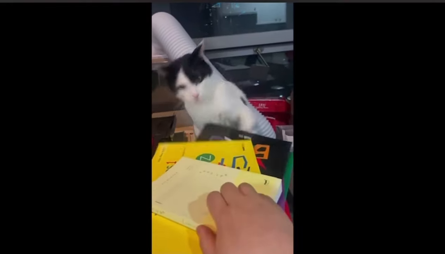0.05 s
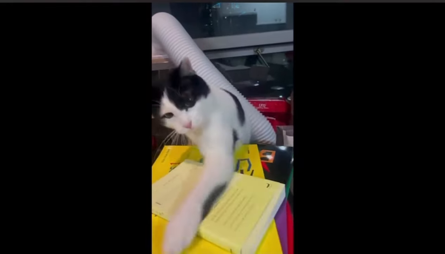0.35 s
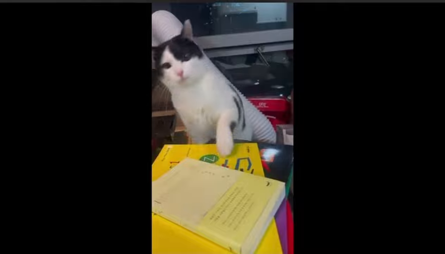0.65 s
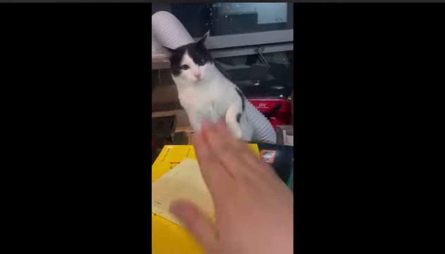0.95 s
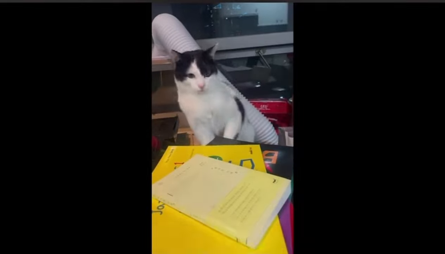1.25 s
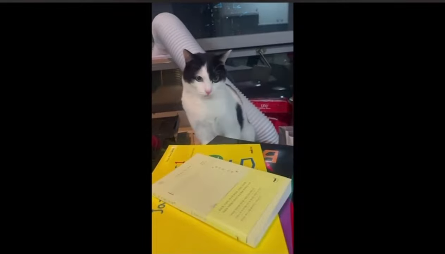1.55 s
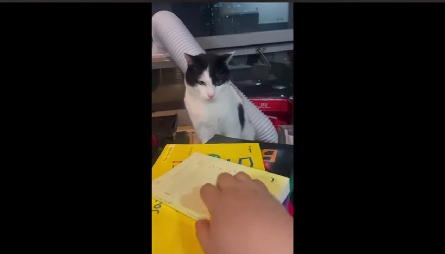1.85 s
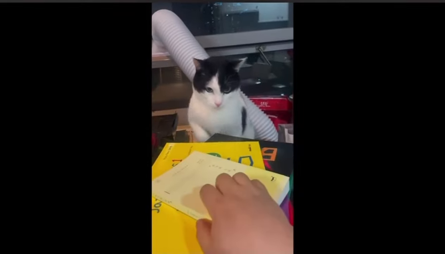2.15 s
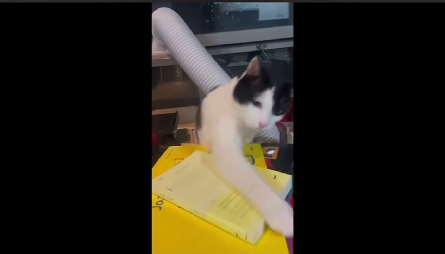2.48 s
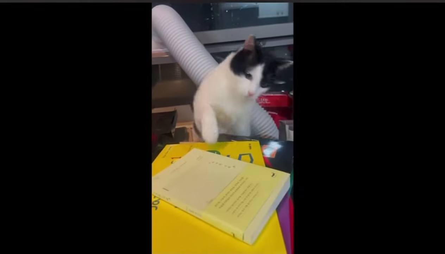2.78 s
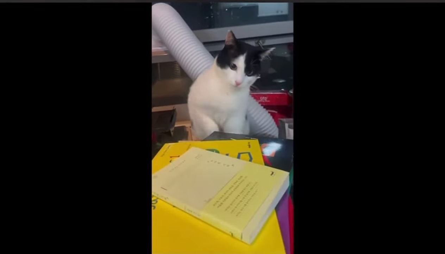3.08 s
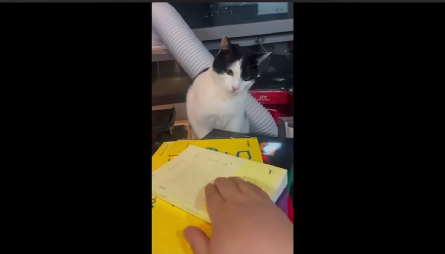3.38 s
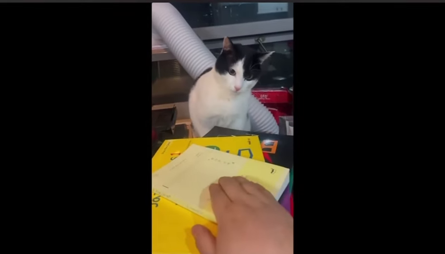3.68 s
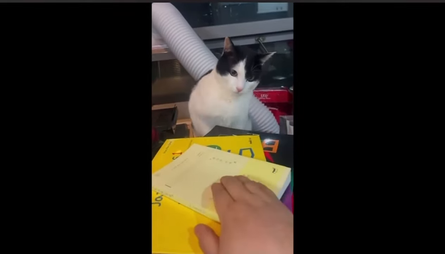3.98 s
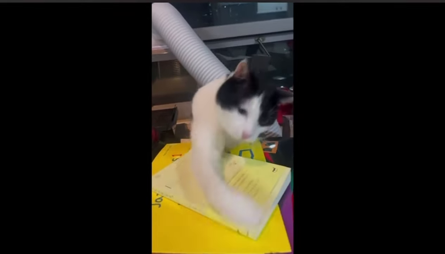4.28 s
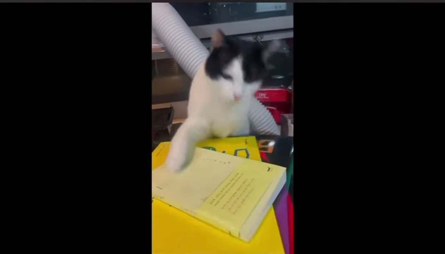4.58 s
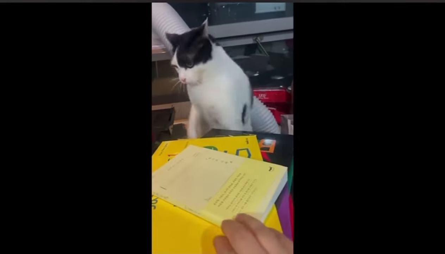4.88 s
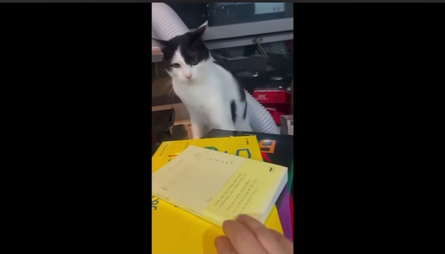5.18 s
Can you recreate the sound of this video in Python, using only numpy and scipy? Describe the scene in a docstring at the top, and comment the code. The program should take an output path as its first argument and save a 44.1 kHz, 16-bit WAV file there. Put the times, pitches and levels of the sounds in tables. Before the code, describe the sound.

Close, papery slaps and dull thuds come in uneven bursts as a hand and a cat's paw strike a notebook on a desk. The hardest smack comes early and slightly overloads the microphone. More hits follow, mixed with brief brushing over paper, sharp claw clicks and faint squeaks, ending in soft pats. The small room adds a short echo over a constant low fan hum.

```python
"""A paper notebook on a desk, slapped and patted in turn by a hand and a cat's paw, close to a small mic.
Each blow cracks on the top page, then thuds with a pitch that plunges as the pages are pressed together.
Skin and fur hiss over the paper, the paw squeaks faintly, and claws, nails and page edges snap.
The desk rings, a small room answers, a fan hums, and the hardest hits overload the input."""
import sys
import numpy as np
from scipy import signal
from scipy.fft import rfft, irfft, next_fast_len
from scipy.io import wavfile
from scipy.ndimage import uniform_filter1d

SR = 44100
rng = np.random.default_rng(int(sys.argv[2]) if len(sys.argv) > 2 else 0)


def log_audio(samples):
    """Write samples as a 16-bit WAV file to the path given in sys.argv[1]."""
    # one column per channel
    frames = np.atleast_2d(samples).T
    # limit to full scale, then quantise
    limited = np.clip(frames, -1, 1)
    pcm = np.round(limited * 32767).astype(np.int16)
    wavfile.write(sys.argv[1], SR, pcm)


N = 235097
TIME = np.arange(N) / SR

# spectrum of cracking paper: f/Hz, level/dB
CRACK_SPECTRUM = [(150, -20), (500, 4.5), (1000, -1.5), (2200, 0), (3500, -7), (6000, -8), (9000, -12),
                  (16000, -19.5)]


def amp(db):
    return 10 ** (np.asarray(db) / 20)


def unit(x):
    """Scales to rms 1."""
    return x / np.sqrt(np.mean(x ** 2) + 1e-20)


def curve(points, hz):
    """Joins points by straight lines on a log-frequency axis."""
    f, value = np.transpose(points)
    return np.interp(np.log(hz + 1), np.log(f + 1), value)


def add(mix, s, sound):
    """Mixes a sound in at time s."""
    part = mix[max(round(s * SR), 0):][:len(sound)]
    part += sound[:len(part)]


def filtered(x, gain_db):
    """EQs x with a gain given as a function of frequency."""
    size = next_fast_len(len(x))
    gain = amp(gain_db(np.fft.rfftfreq(size, 1 / SR)))
    return irfft(rfft(x, size) * gain, size)[:len(x)]


def coloured(x, spectrum, tilt_db=0):
    """Gives x a spectrum, tilted by tilt_db an octave about 4 kHz, at rms 1."""
    return unit(filtered(x, lambda hz: curve(spectrum, hz) + tilt_db * np.log2(np.maximum(hz, 500) / 4000)))


def wander(count, seconds):
    """Smooth random drift of rms 1 that changes over the given time."""
    size = max(round(seconds * SR), 1)
    return unit(uniform_filter1d(uniform_filter1d(rng.standard_normal(count), size), size))


def fan(level_db=-32, waver_db=-1.0):
    """A steady rush of air, humming in the resonances of its duct."""
    # spectrum of the rush: f/Hz, level/dB
    air_spectrum = [(20, -19), (33, -25), (55, -0.5), (105, -7.5), (145, 1), (190, -4.5), (300, -7.5),
                    (400, -16.5), (1100, -26), (2400, -29.5), (3000, -37), (4100, -43.5), (6000, -39.5),
                    (9000, -51.5), (16000, -56)]
    # resonances of fan and duct: f/Hz, width/Hz, boost/dB
    duct = [(210, 28, 4), (299.3, 19.3, 9.5), (535, 130, 4.5), (644, 11, 8.5), (1070, 320, 6),
            (2263, 53, 11.5), (3540, 86, 8), (7450, 1200, 2.5)]
    air = rng.standard_normal(N)
    hum = filtered(air, lambda hz: sum(db / (1 + (2 * (hz - f) / width) ** 2) for f, width, db in duct))
    return amp(level_db + waver_db * wander(N, 0.2)) * coloured(hum, air_spectrum)


def swish(peak, rise, fall):
    """An envelope that gathers, peaks and dies away."""
    away = np.maximum((peak - TIME) / rise, (TIME - peak) / fall)
    return np.exp(-0.8 * abs(away) ** 1.53)  # a power of 1 is pointed, 2 rounded


def crackle(per_s=260, spread_db=5.0, level_db=-6):
    """Now and then a fibre catches and lets go with a tiny tick."""
    sizes = amp(spread_db * np.minimum(rng.exponential(1, N), 3)) * rng.choice([-1, 1], N)
    ticks = sizes * (rng.random(N) < per_s / SR)
    return amp(level_db) * coloured(ticks, CRACK_SPECTRUM)


def strokes(hiss_grain_db=0.9, scrape_grain_db=3, grip_db=1.5):
    """Paper fibres hiss under sliding skin and fur; pressure adds an uneven low scrape."""
    # swipes over the page: peak t/s, rise/s, fall/s, hiss level/dB, scrape level/dB
    swipes = [ (0.023, 0.022, 0.018, -35, -26.5), (.095, .02, 0.017, -43.5, -38.5),
              (.185, .026, 0.035, -31.5, -33), (0.249, 0.019, 0.035, -36.5, -33),
              (.32, 0.0097, 0.024, -42.5, -47), (.375, .025, 0.037, -39.5, -26.5),
              (.48, 0.049, 0.044, -36.5, -40), (.68, 0.029, 0.042, -54, -65),
              (2.25, .075, 0.027, -36.5, -32), (2.378, 0.032, 0.11, -43, -40.5),
              (2.66, 0.017, .045, -45.5, -39.5), (2.89, 0.07, 0.057, -49.5, -47.5),
              (4.02, 0.065, 0.035, -46.5, -31.5), (4.225, 0.069, 0.042, -24.5, -25.5),
              (4.4, 0.091, 0.1, -41.5, -43.5), (4.58, 0.028, 0.046, -48.5, -40.5),
              (5.166, .016, 0.056, -41.5, -38)]
    # spectrum of the fibres' hiss: f/Hz, level/dB
    hiss_spectrum = [(300, -16), (1200, -6.5), (2500, 3), (4200, 0.5), (6400, 1), (9000, -1.5),
                     (12000, -5.5), (16000, -6)]
    # spectrum of the scrape: f/Hz, level/dB
    scrape_spectrum = [(100, -27), (300, 0), (550, -7.5), (1300, -7), (2000, -16), (3500, -29),
                       (8000, -53.5)]
    hiss, scrape = np.zeros((2, N))
    for s, rise, fall, hiss_db, scrape_db in swipes:
        speed = swish(s, rise, fall)
        hiss += amp(hiss_db) * speed
        scrape += amp(scrape_db) * speed
    fibres = coloured(rng.standard_normal(N) * amp(hiss_grain_db * wander(N, 0.0037)), hiss_spectrum)
    slips = coloured(rng.standard_normal(N) * amp(scrape_grain_db * wander(N, 0.0033)), scrape_spectrum)
    friction = hiss * (fibres + crackle()) + scrape * slips
    return friction * amp(grip_db * wander(N, 0.014))  # the touch grips and eases


def burst(spectrum, length, tilt_db=0, grain_db=4.5):
    """A clump of tiny paper contacts starts at once and thins out: direct sound and room send."""
    t = TIME[:SR // 8]
    contacts = rng.standard_normal(len(t)) * amp(grain_db * wander(len(t), 0.00049))
    envelope = (1 - np.exp(-t / 0.000095)) * np.exp(-(t / length) ** 0.76)
    direct = coloured(contacts, spectrum, tilt_db) * envelope
    # summed over all directions, the contacts merge into one smooth click of the same energy
    click = signal.unit_impulse(len(t), SR // 400)
    return np.array([direct, coloured(click, spectrum, tilt_db) * direct.std()])


def thud(start_hz, end_hz, glide_s, length, rough=0.73, wobble=0.15, plunge=2.74):
    """The stack of pages gives way: high ripples come first, the slow heave of the whole book last."""
    t = TIME[:SR // 4]
    hz = end_hz + (start_hz - end_hz) / (1 + (t / glide_s) ** plunge)
    hz *= np.exp(wobble * wander(len(t), 0.00041))  # the pages close unevenly
    cycles = np.cumsum(hz) / SR
    swell = 1 - np.exp(-cycles / 1.24)
    flutter = 1 + rough * wander(len(t), 0.001)
    return np.sin(2 * np.pi * cycles) * swell * flutter * np.exp(-(t / length) ** 1.72)


def pat(db, hz):
    """A light touch only dents the top pages; a harder one is higher, shorter and cracks more."""
    octaves = np.log2(hz / 1000)
    length = 0.0059 / 2 ** (0.57 * octaves)
    crack_db = db - 17.5 + 11.5 * octaves
    crack, send = amp(crack_db) * burst(CRACK_SPECTRUM, length)
    return amp(db) * thud(hz, end_hz=0.548 * hz, glide_s=0.647 * length, length=length), crack, send


def slap(thud_db, start_hz, end_hz, closing_s, length, crack_db):
    """A flat blow presses the whole stack shut: thud, crack and the crack's room send."""
    crack, send = amp(crack_db) * burst(CRACK_SPECTRUM, length=0.0046)
    return amp(thud_db) * thud(start_hz, end_hz, closing_s, length), crack, send


def blows():
    """Every slap and pat is a crack on the top page and a thud through the book."""
    # flat hand or paw: t/s, thud level/dB, start f/Hz, end f/Hz, closing/s, thud length/s, crack level/dB
    slaps = [ (0.1968, -8.5, 1744, 113, .0017, .01, -18), (0.3654, -1.5, 1550, 114.4, 0.0021, 0.016, -15.5),
             (0.4652, -10.5, 1208, 85, 0.0025, 0.013, -24), (.9678, 4.5, 2652, 109, 0.0036, 0.012, -3.5),
             (1.813, -14, 2170, 95.6, 0.0052, 0.027, -17.5), (2.2893, -6, 2030, 189, .0032, 0.014, -11),
             (2.2956, -5, 1535, 120.5, .0028, 0.019, -19.5),
             (2.366, -16.5, 1508, 95.3, .0035, 0.078, -24.5),
             (3.2996, -10, 2090, 74.6, 0.0042, 0.024, -12.5), (4.0959, -4.5, 1985, 190, .0022, .016, -15),
             (4.225, -15, 299, 143, 0.0059, 0.034, -34), (4.766, -25.5, 1960, 102, 0.0012, 0.025, -18)]
    # toes and fingertips: t/s, level/dB, start f/Hz
    pats = [ (.028, -10.5, 570), (0.0969, -11.5, 406), (.107, -14, 430), (0.119, -6.5, 280),
            (.232, -29, 1860), (.246, -12, 680), (.264, -10.5, 720), (.358, -8, 640), (2.085, -26.5, 1650),
            (2.2498, -17.5, 1480), (2.268, -1.5, 346), (4.024, -15.5, 1590), (4.047, -26, 1490),
            (4.106, -7.5, 1330), (4.198, -10, 1990), (4.59, -21, 2100), (4.8142, -16.5, 1620),
            (5.1282, -20.5, 883), (5.158, -25, 784)]
    # the colour the book gives a thud: f/Hz, gain/dB
    book_eq = [(60, -4.5), (130, 3), (250, -0.5), (400, -1.5), (560, -4), (850, -3), (1250, -6.5),
               (1900, -2.5), (3000, 2)]
    thuds, cracks, sends = np.zeros((3, N))
    for strike, cues in [(slap, slaps), (pat, pats)]:
        for s, *settings in cues:
            body, crack, send = strike(*settings)
            add(thuds, s, body)
            add(cracks, s, crack)
            add(sends, s, send)
    return filtered(thuds, lambda hz: curve(book_eq, hz)), cracks, sends


def echoes(x, low_cut_hz=350):
    """Clutter on the desk throws back the waves that are shorter than it is."""
    # reflections off nearby surfaces: delay/s, level/dB
    reflections = [(.0013, -39), (.0031, -20), (.0052, -15), (.0089, -20.5), (.0137, -25)]
    short_waves = signal.sosfilt(signal.butter(1, low_cut_hz, "highpass", fs=SR, output="sos"), x)
    out = np.zeros(N)
    for delay, db in reflections:
        add(out, delay, amp(db) * short_waves)
    return out


def ringing(force, modes, level_db):
    """A solid object rings on in its decaying modes."""
    t = TIME[:SR // 2]
    ring = sum(amp(db - 60 * t / t60) * np.sin(2 * np.pi * hz * t) for hz, db, t60 in modes)
    return amp(level_db) * signal.fftconvolve(force, ring)[:N]


def room(send, build_s=0.0097):
    """Dense reflections build up quickly in a small room; each band dies at its own speed."""
    # reverb time: f/Hz, t60/s
    decay_times = [(80, 0.5), (300, 0.48), (1000, 0.4), (3000, 0.22), (6000, 0.31), (15000, 0.2)]
    # reverb colour: f/Hz, gain/dB
    room_eq = [(60, -3), (300, -12.5), (1000, -14), (3000, -10.5), (4500, -9), (6000, -14), (15000, -10.5)]
    t = TIME[:SR * 3 // 4]
    hz, frame_s, bands = signal.stft(rng.standard_normal(len(t)), SR, nperseg=256)
    t60 = curve(decay_times, hz)[:, None]
    bands *= np.sqrt(2 * np.log(1000) / (t60 * SR))  # the same energy whatever the decay
    bands *= amp(curve(room_eq, hz)[:, None] - 60 * frame_s / t60)
    tail = signal.istft(bands, SR, nperseg=256)[1][:len(t)]
    fade_in = 1 - np.exp(-(t / build_s) ** 2)
    return signal.fftconvolve(send, tail * fade_in)[:N]


def heaves(hz=54.3, rise_s=0.0046, decay_s=0.057):
    """The whole desk makes a few slow swings under a heavy blow."""
    # heavy slaps: t/s, heave level/dB
    cues = [(0.367, -12), (0.974, -16.5), (2.293, -34)]
    out, t = np.zeros(N), TIME[:SR // 3]
    swing = np.sin(2 * np.pi * hz * t) * (1 - np.exp(-t / rise_s)) * np.exp(-(t / decay_s) ** 1.5)
    for s, db in cues:
        add(out, s, amp(db) * swing)
    return out


def snaps():
    """Claws, nails and page edges snap brightly: direct sound and room send."""
    # sharp contacts: t/s, level/dB, length/s, tilt/dB per octave, room send/dB
    cues = [ (0.964, -10, 0.0054, -6.5, 13), (1.832, -14.5, 0.0021, 0.5, -5),
            (2.2869, -3, 0.00089, -3.5, -4), (3.308, -9, 0.00069, 3.5, -5), (4.158, 2, .0017, -0.5, 3),
            (4.1784, -1.5, 0.0086, -1, 1.5), (4.7668, -2, 0.00074, 2.5, 0.5)]
    # spectrum of a snap: f/Hz, level/dB
    snap_spectrum = [(200, -57), (700, -9), (1900, -0.5), (3500, -5.5), (6000, 3), (8500, -2),
                     (12000, -9.5), (16000, -11)]
    direct, sends = np.zeros((2, N))
    for s, db, length, tilt_db, send_db in cues:
        snap, send = burst(snap_spectrum, length, tilt_db)
        add(direct, s, amp(db) * snap)
        add(sends, s, amp(db + send_db) * send)
    return direct, sends


def tail_and_squeaks():
    """Fuzzy bands near 3 kHz: the loudest slap's bright room tail, then faint squeaks of a dragged paw."""
    # the tail, then the squeaks: peak t/s, rise/s, fall/s, level/dB, f/Hz, width/Hz
    bands = [(1.0, .012, 0.071, -31, 3060, 2200), (4.39, 0.032, 0.035, -36.5, 2950, 1100),
             (4.63, .02, .025, -48.5, 3600, 160), (4.915, 0.023, .02, -50.5, 3060, 606)]
    out = np.zeros(N)
    for s, rise, fall, db, hz, width in bands:
        fuzzy_tone = unit(wander(N, 0.66 / width) * np.sin(2 * np.pi * hz * TIME))
        out += amp(db) * swish(s, rise, fall) * fuzzy_tone
    return out


def scene(crack_send_db=3, muffle_hz=900):
    """The notebook up close, the room around it and the fan behind."""
    # modes of the desk under the book: f/Hz, level/dB, t60/s
    desk_modes = [(54, -29, .3), (90.4, 9, 0.22), (142, 4, 0.17), (169.3, -3, 0.3), (309, -31, 0.13)]
    # modes of hard things standing on the desk: f/Hz, level/dB, t60/s
    clutter_modes = [(2150, -4, 0.12), (3194, 13, 0.18), (3630, -1, 0.3), (3980, -12, 0.31),
                     (4150, -12, .4), (5960, -5, .35), (6140, -5, 0.3), (8800, -8, 0.25)]
    thuds, cracks, crack_send = blows()
    snapping, snap_send = snaps()
    hits = thuds + cracks
    textures = strokes() + tail_and_squeaks()
    desk = ringing(hits, desk_modes, level_db=-61.5) + heaves()
    near = hits + echoes(hits) + desk + snapping + textures
    # the book muffles the thud on its way out, while the crack radiates freely
    muffled = signal.sosfilt(signal.butter(1, muffle_hz, fs=SR, output="sos"), thuds)
    send = muffled + amp(crack_send_db) * crack_send + snap_send + textures
    clutter = ringing(send, clutter_modes, level_db=-62)
    return (near + room(send) + clutter + fan())[None]


def record(dry):
    """The microphone drops the deepest bass, soft-clips the hardest hits and cuts the extreme top."""
    low_cut_hz, ceiling, high_cut_hz = 30, 0.95, 16000
    x = signal.sosfilt(signal.butter(2, low_cut_hz, "highpass", fs=SR, output="sos"), dry)
    clipped = x / (1 + (x / ceiling) ** 8) ** (1 / 8)
    lowpass = signal.firwin(301, high_cut_hz, window=("kaiser", 8), fs=SR)
    return signal.oaconvolve(clipped, lowpass[None], "same")


dry = scene()
out = record(dry)
log_audio(out)
```